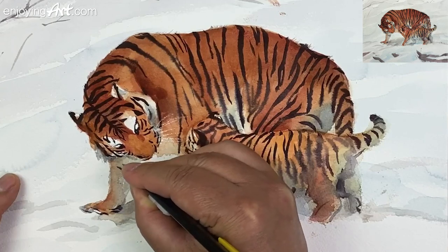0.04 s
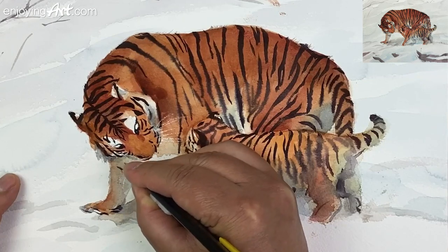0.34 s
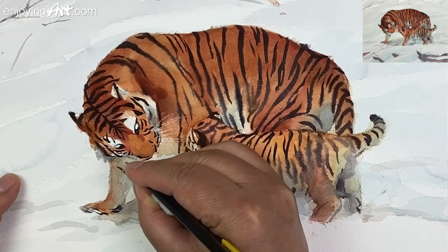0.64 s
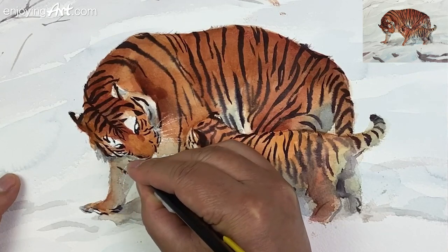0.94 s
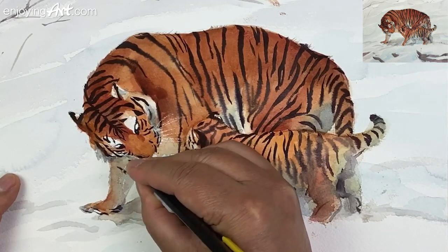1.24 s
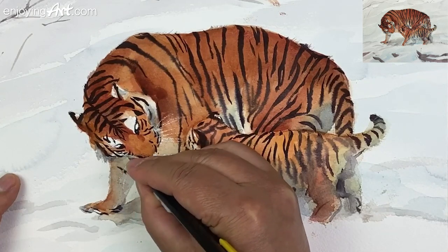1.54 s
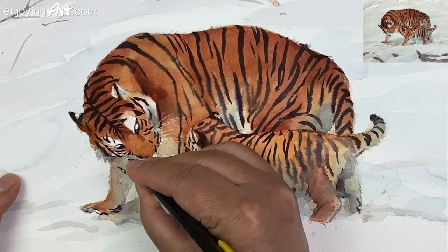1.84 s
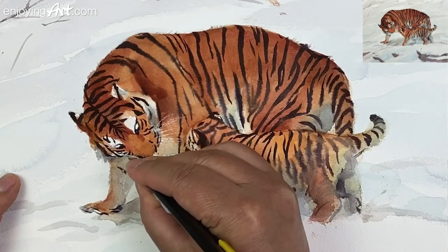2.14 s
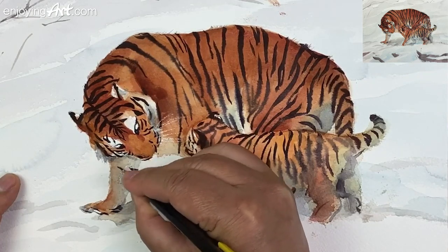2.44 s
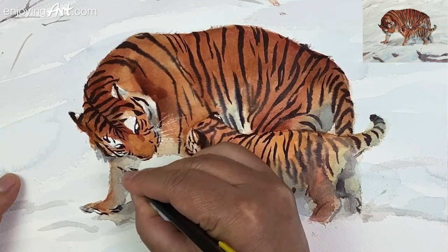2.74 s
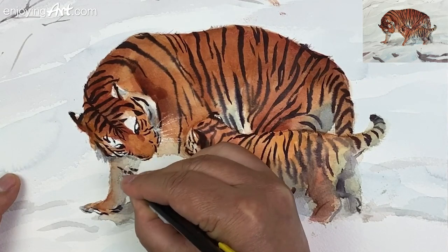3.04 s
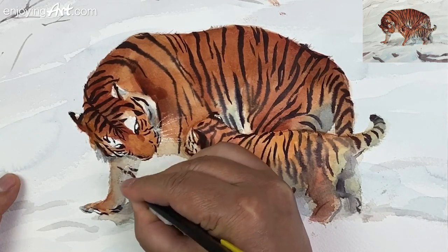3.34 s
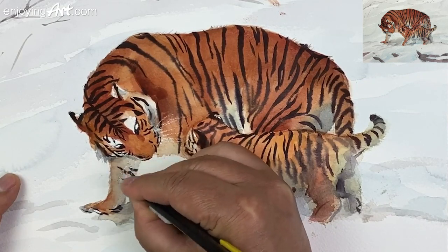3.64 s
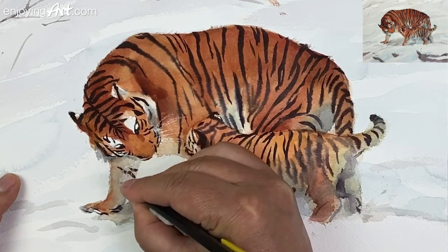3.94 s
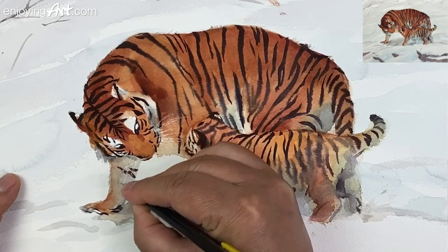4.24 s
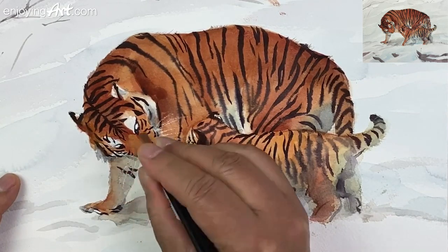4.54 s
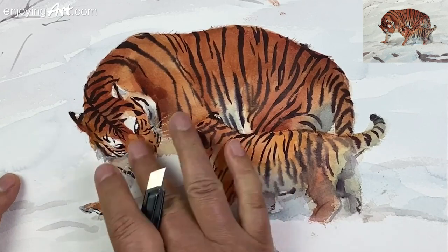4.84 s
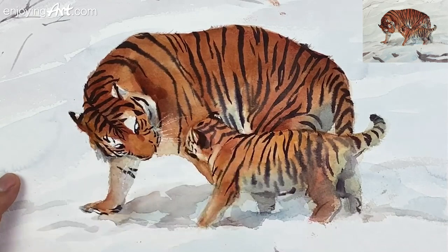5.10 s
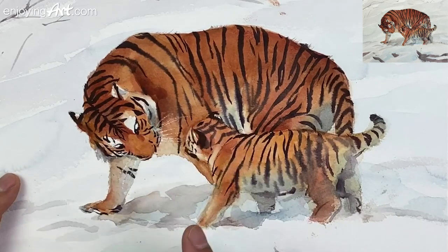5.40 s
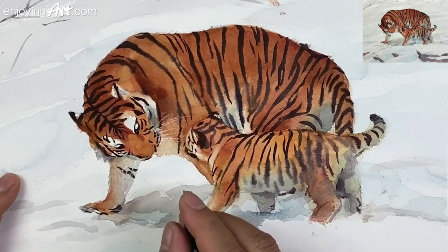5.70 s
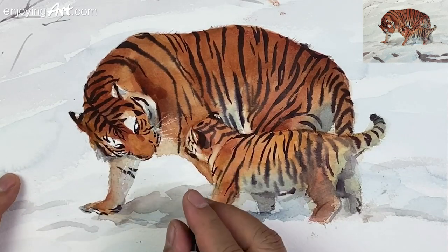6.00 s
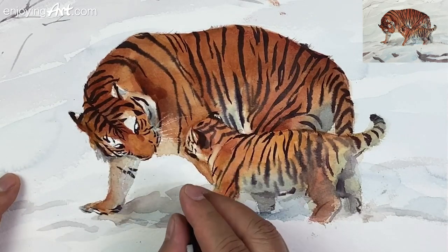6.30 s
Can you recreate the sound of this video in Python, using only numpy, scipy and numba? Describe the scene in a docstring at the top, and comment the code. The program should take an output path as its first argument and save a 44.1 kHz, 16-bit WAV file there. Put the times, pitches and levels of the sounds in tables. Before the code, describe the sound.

A craft knife scratches dry watercolour paper close to the microphone in a quiet room. The strokes are short, gritty and bright, a little uneven at first, then coming in a quick run and pressing harder, with faint low knocks from the board and desk beneath. The scraping stops, fingers sweep once across the sheet with a soft hiss, and only faint room noise remains.

```python
"""In a quiet room, a craft knife scratches highlights into dry watercolour paper on a board, close by.
The tip catches and slips on the paper's tiny bumps, which makes blade and sheet ring. Heavy strokes
shake the board and the desk under it. Then the hand changes its grip and the fingers sweep the crumbs
away. A faint, long echo and the room's steady rumble and hiss lie behind it all."""
import sys
import numpy as np
from scipy import signal
from scipy.fft import rfft, irfft, next_fast_len
from scipy.io import wavfile
from numba import njit

SR = 44100
rng = np.random.default_rng(int(sys.argv[2]) if len(sys.argv) > 2 else 0)


def materialize(psi):
    """Save the field psi as 16-bit PCM at rate SR to the path in sys.argv[1].

    A 1-D psi becomes a single channel; in a 2-D psi each row is a channel.
    """
    bounded = np.clip(np.atleast_2d(psi).T, -1, 1)
    quanta = np.round(bounded * 32767).astype(np.int16)
    wavfile.write(sys.argv[1], SR, quanta)


N = 289296
TIME = np.arange(N) / SR

# Knife strokes. Levels in all tables are relative. (start [s], landing time [s], time to peak [s],
# lift time [s], peak level [dB], landing level below peak [dB], sheet against rasp [dB],
# boost of low tones [dB], boost of high tones [dB])
KNIFE_STROKES = [ (0.161, .02, 0.023, 0.13, -42, 22, -6, -6.5, -1),
                 (0.414, .016, 0.075, 0.077, -41, 8, -6, -5.5, -3.5),
                 (0.942, .006, 0.014, .016, -64, -6, -12, -6, -11),
                 (1.055, .01, 0.049, 0.077, -32, 24.5, -6, -8.5, 3),
                 (1.184, .015, 0.039, 0.099, -36.5, 4, -6.5, -6, -5.5),
                 (1.327, .006, 0.024, 0.12, -33, 2.5, -7.5, -8.5, -3),
                 (1.532, .004, 0.0075, 0.021, -48, 5, -3.5, -9, -7),
                 (1.598, .004, 0.054, 0.083, -31.5, 3, -8.5, -3.5, -3),
                 (1.713, .008, 0.028, 0.024, -41.5, 15, -5.5, -8.5, -6),
                 (1.876, .005, 0.05, 0.083, -32, 9.5, -10.5, 2.5, -2),
                 (2.006, .006, 0.02, 0.046, -34.5, 10, -8.5, -1, -5.5),
                 (2.114, 0.02, 0.062, 0.099, -32.5, 5, -6.5, -4.5, -1),
                 (2.404, .006, 0.042, 0.086, -29.5, 7, -7, -2, -1),
                 (2.536, .01, 0.045, 0.074, -33.5, 7, -8, -3.5, -1.5),
                 (2.679, .02, .062, 0.069, -28.5, 7, -8.5, -1, 0),
                 (2.804, .006, 0.03, 0.067, -33, 14.5, -9.5, 0, -5.5),
                 (2.902, .004, 0.0036, 0.019, -50, 11.5, -3.5, 1, -4),
                 (2.947, .009, .068, 0.088, -29, 10.5, -9, 1, -2),
                 (3.1, .006, 0.071, .063, -37, 1, -8.5, -2.5, -6),
                 (3.26, .014, 0.045, 0.073, -26.5, 15, -7, 2.5, -2),
                 (3.38, .006, 0.037, 0.045, -34, 20, -10, -3.5, -7),
                 (3.487, .004, 0.0072, 0.013, -43, 17.5, -4, -2, -10),
                 (3.567, .003, 0.052, 0.057, -28, 11, -6, -0.5, -2.5),
                 (3.685, .006, 0.034, 0.053, -38, 21, -11, 0, -4),
                 (3.782, .004, 0.0081, 0.019, -46.5, 10, -3, -2, -4),
                 (3.849, .006, 0.068, 0.05, -28, 16.5, -8, 2.5, -1.5),
                 (4.081, .004, 0.0042, 0.017, -54.5, 20, 3, -4, 1),
                 (4.144, .004, 0.093, 0.07, -35, 3, -6, 3, -4.5), ]
# The tip lands or tears free of a fibre. (time [s], level [dB])
FIBRE_SNAGS = [(0.1777, -35.5), (0.201, -19), (0.297, -36.5), (0.441, -24), (0.465, -20), (0.9632, -43.5),
               (1.0908, -22.5), (1.1039, -28.5), (1.27, -21.5), (1.3319, -25), (1.5409, -38.5),
               (1.6003, -19.5), (1.6327, -14.5), (1.6796, -20), (1.6844, -17.5), (1.9646, -17),
               (2.133, -19), (2.141, -12.5), (2.4107, -23), (2.459, -20.5), (2.7595, -14), (2.9078, -33),
               (2.961, -22), (3.0584, -18.5), (3.2804, -14.5), (3.327, -12.5), (3.407, -22.5), (3.493, -38),
               (3.5707, -13), (3.6022, -14), (3.7918, -35), (4.147, -23.5), (4.1894, -15.5), (4.2482, -15)]
# The tones that blade and sheet ring with. (pitch [Hz], width [Hz], level [dB])
KNIFE_TONES = [(513, 82, -12.5), (661, 49, 1.5), (774, 59, -4.5), (988, 230, -7.5), (1123, 22, 0.5),
               (1293, 230, -5), (1567, 332, -7), (1865, 47, 0), (2176, 1100, -8.5), (2610, 130, -14),
               (2860, 1400, -16.5), (3734, 330, -7), (4150, 120, -11), (4244, 250, -3.5), (4485, 120, 3),
               (4700, 190, -5), (5160, 350, -6.5), (5680, 840, -11), (5670, 217, -17), (6370, 900, -2.5),
               (6610, 190, -8.5), (6950, 350, -7), (8530, 980, -7.5), (9440, 710, -12.5),
               (10290, 250, -9.5), (11175, 138, -11.5), (11330, 420, -4.5), (11870, 5700, -13),
               (13159, 570, -16), (15073, 1100, -13.5)]
# Pressing harder favours the blade's lower group of tones over its upper one.
# (lower edge [Hz], lower group [Hz], upper group [Hz], upper edge [Hz])
BLADE_GROUPS = (3000, 4400, 6300, 9000)
# The low tones of the board and of the desk. (pitch [Hz], width [Hz], level [dB])
BOARD_TONES = [(257.5, 32, 4), (160, 40, -7)]
DESK_TONES = [(75.4, 24, 6.5), (111, 20, -28)]
# Shakes from heavy strokes.
# (time [s], half length [s], board level [dB], desk delay [s], desk level [dB])
HEAVY_SHAKES = [(0.49, 0.015, -68.5, 0.042, -62), (1.11, 0.022, -71.5, 0.061, -64.5),
                (1.36, 0.044, -69, 0.03, -71), (1.67, 0.043, -56.5, 0.025, -58.5),
                (1.955, 0.027, -59.5, 0.02, -62), (2.2, 0.016, -65.5, 0.0054, -62),
                (2.462, 0.033, -51, 0.033, -51.5), (2.77, 0.043, -51.5, 0.028, -49),
                (3.025, 0.045, -53, 0.051, -56.5), (3.345, 0.034, -50.5, 0.0072, -51),
                (3.625, 0.05, -52, 0.01, -60), (3.92, 0.025, -48.5, 0.042, -60),
                (4.21, 0.053, -48, 0.025, -48.5)]
# Small rustles of the hand. (time [s], level [dB], pitch [Hz], width [Hz], half length [s])
GRIP_RUSTLES = [(3.994, -55, 1490, 2000, 0.0099), (4.769, -71, 5740, 2600, 0.12),
                (5.308, -60, 5900, 6000, 0.007), (5.488, -69, 800, 1405, 0.0094)]
# The fingers' sweep and the hollow under the hand.
# (time [s], level [dB], hollow pitch [Hz], hollow against level [dB])
FINGER_SWEEP = [(4.62, -74, 1610, -30), (4.8, -66, 1580, -17), (4.85, -53.5, 1660, -19),
                (4.868, -46.5, 1730, -12.5), (4.916, -42, 1390, -5.5), (4.97, -39.5, 1840, -5),
                (5.03, -71, 1800, -8)]
# The hiss of skin on paper. (frequency [Hz], level [dB])
SKIN_SPECTRUM = [(1410, -36), (2400, -6), (3540, -5.5), (3800, -2.5), (9550, -4.5), (11400, -3.5),
                 (14100, -6), (16000, -16)]
# The room's rumble and hiss. (frequency [Hz], level [dB])
ROOM_SPECTRUM = [(15, -22.5), (25, -6.5), (92, -1.5), (123, -10.5), (285, -9), (463, -16.5), (545, -22.5),
                 (659, -22.5), (1160, -26), (1440, -18), (1790, -26), (2550, -26), (10100, -32),
                 (14400, -37), (16000, -43.5)]


def undb(db):
    """Turn decibels into a number to multiply by."""
    return 10 ** (np.asarray(db) / 20)


def unit(x):
    """Scale a sound to an average strength (rms) of 1."""
    return x / np.sqrt(np.mean(x ** 2))


def fade(age, fade_s):
    """A level that falls by 60 dB every fade_s seconds."""
    return np.exp(-np.log(1000) * age / fade_s)


def lows(x, hz, order=4):
    """Keep the part of a sound below hz, without delaying it."""
    return signal.sosfiltfilt(signal.butter(order, hz, fs=SR, output="sos"), x)


def ring(x, response):
    """Let a sound ring in an object, given that object's response to one tap."""
    return signal.oaconvolve(x, response)[:N]


def resonator(tones, size=16384):
    """The response to one tap, with energy 1, of an object that rings with these tones."""
    f = np.maximum(np.arange(size // 2 + 1) * SR / size, 1)
    power = sum(undb(db) ** 2 / (1 + ((f * f - hz * hz) / (f * width)) ** 2) ** 2
                for hz, width, db in tones)
    # folding the cepstrum puts all the ringing after the tap
    cepstrum = irfft(np.log(power + 1e-9) / 2)
    cepstrum[1:size // 2] *= 2
    cepstrum[size // 2 + 1:] = 0
    response = irfft(np.exp(rfft(cepstrum)))[:size // 2]
    return response / np.linalg.norm(response)


def damped(hz, width, db, loss):
    """Widen tones by a share of their pitch: they die sooner but keep their energy."""
    wider = width + loss * hz
    return zip(hz, wider, db + 10 * np.log10(width / wider))


def hiss(spectrum):
    """Steady noise of strength 1, shaped by a spectrum table."""
    size = next_fast_len(2 * N)
    freqs = np.maximum(np.arange(size // 2 + 1) * SR / size, 1)
    hz, db = np.transpose(spectrum)
    gain = undb(np.interp(np.log(freqs), np.log(hz), db))
    return unit(irfft(rfft(rng.standard_normal(size)) * gain, size)[:N])


def room_background(blurred_ring, echo_db=-69.5, echo_s=2., steady_db=-69):
    """The room rumbles and hisses; at first the echo of earlier strokes still hangs in it."""
    echo = ring(rng.standard_normal(N), blurred_ring) * undb(echo_db) * fade(TIME, echo_s)
    return echo + undb(steady_db) * hiss(ROOM_SPECTRUM)


def stroke_levels(lift_db=30.5, lift_curve=2.235, flatten=0.085):
    """How strong rasp and sheet are as each stroke lands, presses to a peak and lifts ever faster."""
    rasp, sheet = np.zeros(N), np.zeros(N)
    for start, land, peak, lift, level_db, landing_db, sheet_db, _, _ in KNIFE_STROKES:
        on = (TIME >= start) & (TIME < start + peak + 2 * lift)
        age = TIME[on] - start
        eased_db = landing_db * np.maximum(1 - age / peak, 0)
        eased_db += lift_db * (np.maximum(age - peak, 0) / lift) ** lift_curve
        gain = np.minimum(age / land, 1) * undb(level_db - eased_db)
        rasp[on] += gain
        sheet[on] += gain * undb(sheet_db + flatten * eased_db)  # a flatter tip moves more of the sheet
    return rasp, sheet


def paper_grain(pressure, grains_per_s=3500, fibres_per_s=110, wavers_per_s=110, fibre_s=0.001):
    """The tip sticks and slips: a click at each grain, over fine rubbing. Fibres tug; the grip wavers."""
    share = np.clip(pressure, .2, 1)  # a light tip meets only the highest grains, so it crackles
    hits = rng.random(N) < share * grains_per_s / SR
    sizes = undb(1.5 * np.minimum(rng.exponential(size=N), 3))
    clicks = unit(hits * sizes * rng.choice([-1, 1], N) / np.sqrt(share))
    rubbing = undb(-3.5) * rng.standard_normal(N)
    fibres = (rng.random(N) < fibres_per_s / SR) * rng.random(N)
    tug = signal.lfilter([undb(3)], [1, -np.exp(-1 / (fibre_s * SR))], fibres)  # jumps, then fades
    grip_db = 2.03 * np.interp(TIME * wavers_per_s, np.arange(N), rng.standard_normal(N))
    return unit((clicks + rubbing) * (1 + tug) * undb(grip_db))


def snags(gain_db=-7, crumble_s=0.002):
    """A thick fibre lets go in a quick burst of tiny cracks."""
    force = np.zeros(N)
    age = np.arange(SR // 50) / SR
    for time, db in FIBRE_SNAGS:
        start = int(time * SR)
        cracks = rng.choice([-1, 1], len(age)) * np.exp(-age / crumble_s)
        force[start:start + len(age)] += undb(db + gain_db) * cracks
    return force


def tip_force(rasp, sheet, body_db=6, snag_body_db=-5, split_hz=2900, firm_db=-31):
    """The tip's push on the paper: a low body from the sheet and a high, rasping edge."""
    pressure = rasp / undb(firm_db)
    drag, catches = paper_grain(pressure), snags()
    soft = lows(drag, hz=10000, order=2)
    drag = soft + (drag - soft) * pressure ** 0.33  # a lighter touch sounds duller
    body = lows(drag * sheet * undb(body_db) + catches * undb(snag_body_db), split_hz)
    edge = drag * rasp + catches
    return body + edge - lows(edge, split_hz)


def held_tones(level_db, low_db, high_db, detune=0.0098, loss=.012, balance_db=-36.5):
    """One stroke's tones: the grip detunes and damps the blade, and pressure deepens its ring."""
    hz, width, db = np.transpose(KNIFE_TONES)
    pitch_luck, level_luck = rng.standard_normal((2, len(hz)))
    is_blade = hz > 3500
    low_boost = np.interp(hz, (700, 1300), [low_db, 0])
    high_boost = high_db * np.maximum(hz - 6000, 0) / 6000
    press_db = np.clip(0.25 * (level_db - balance_db), -1.5, 1.5)
    deepening = press_db * np.interp(hz, BLADE_GROUPS, [0, 1, -1, 0])
    db = db + low_boost + high_boost + deepening + 0.08 * level_luck
    return damped(hz * (1 + detune * pitch_luck * is_blade), width, db, loss * is_blade)


def knife(force):
    """The tip's push makes blade and sheet ring, a little differently at every stroke."""
    edges = [0] + [int(stroke[0] * SR) for stroke in KNIFE_STROKES[1:]] + [N]
    sound = np.zeros(2 * N)
    for start, end, (*_, level_db, _, _, low_db, high_db) in zip(edges, edges[1:], KNIFE_STROKES):
        response = resonator(held_tones(level_db, low_db, high_db), size=4096)
        scratch = signal.fftconvolve(force[start:end], response)
        sound[start:start + len(scratch)] += scratch
    return sound[:N]


def wobble(tones):
    """Random shaking at low tones; the hand damps it, so its size stays even."""
    shake = signal.hilbert(ring(rng.standard_normal(N), resonator(tones)))
    return unit(shake.real / np.abs(shake) ** (2 / 3))


def board_and_desk(rasp, board_gain_db=-2, desk_gain_db=0.5, drag_db=-33):
    """The dragging tip stirs the board a little; heavy strokes shake it, and the desk follows."""
    on_board, on_desk = undb(drag_db) * rasp, np.zeros(N)
    for time, length, board_db, delay, desk_db in HEAVY_SHAKES:
        on_board += undb(board_db) * np.exp(-((TIME - time) / length) ** 2)
        on_desk += undb(desk_db) / (1 + ((TIME - time - delay) / (1.2 * length)) ** 2 / 2) ** 2
    board = undb(board_gain_db) * on_board * wobble(BOARD_TONES)
    desk = undb(desk_gain_db) * on_desk * wobble(DESK_TONES)
    return board + desk


def grip_rustles():
    """The hand changes its grip with brief, soft rustles."""
    sound = np.zeros(N)
    for time, db, hz, width, length in GRIP_RUSTLES:
        swell = undb(db) * np.exp(-((TIME - time) / length) ** 2)
        sound += swell * ring(rng.standard_normal(N), resonator([(hz, width, 0)]))
    return sound


@njit
def moving_band(x, hz, width):
    """Keep only the sound near a moving pitch (a state-variable filter)."""
    y, band_state, low_state = np.empty(len(x)), 0., 0.
    for i in range(len(x)):
        tuning, damping = np.tan(np.pi * hz[i] / SR), width / hz[i]
        band = (band_state + tuning * (x[i] - low_state)) / (1 + tuning * (tuning + damping))
        band_state = 2 * band - band_state
        low_state += 2 * tuning * band
        y[i] = damping * band
    return y


def finger_sweep(skin_db=-3.5, width_hz=520.):
    """Fingers slide over the sheet: a smooth hiss, coloured by the changing hollow under the hand."""
    times, *columns = np.transpose(FINGER_SWEEP)
    level_db, hz, hollow_db = [np.interp(TIME, times, column) for column in columns]
    sliding = (TIME >= times[0]) & (TIME < times[-1])
    hollow = moving_band(rng.standard_normal(N), hz, width_hz)
    hollow = unit(moving_band(hollow, hz, width_hz))
    skin = undb(skin_db) * hiss(SKIN_SPECTRUM)
    return sliding * undb(level_db) * (skin + undb(hollow_db) * hollow)


def room_echo(close, all_round, near_db=-2.5, near_s=0.071, far_db=-22, far_s=2.1, treble_s=0.98):
    """Small things nearby throw back the close sound's treble; what goes all round leaves a long tail."""
    age = np.arange(2 * SR) / SR
    near, far = rng.standard_normal((2, len(age))) * (age > .001)
    near = (near - lows(near, hz=1100, order=1)) * fade(age, near_s)
    dull = lows(far, hz=4000, order=1)
    far = dull * fade(age, far_s) + (far - dull) * fade(age, treble_s)
    near_echo = undb(near_db) * ring(close, near / np.linalg.norm(near))
    far_echo = undb(far_db) * ring(all_round, far / np.linalg.norm(far))
    return near_echo + far_echo


def scene():
    """Mix knife, board, hand and room into one channel."""
    rasp, sheet = stroke_levels()
    force = tip_force(rasp, sheet)
    board_and_hand = board_and_desk(rasp) + finger_sweep() + grip_rustles()
    # sound reaches the walls from every side of the sheet, so its tones blur together
    blurred_ring = resonator(damped(*np.transpose(KNIFE_TONES), loss=0.23))
    close = knife(force) + board_and_hand
    all_round = ring(force, blurred_ring) + board_and_hand
    return (close + room_echo(close, all_round) + room_background(blurred_ring))[None]


def record(dry, top_hz=15800):
    """Cut off the very highest treble."""
    return signal.sosfilt(signal.ellip(10, .2, 70, top_hz, fs=SR, output="sos"), dry)


dry = scene()
out = record(dry)
materialize(out)
```